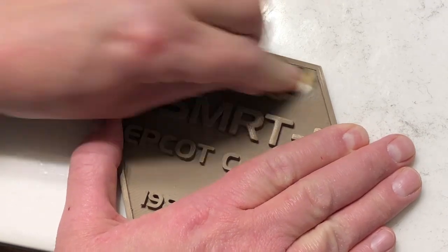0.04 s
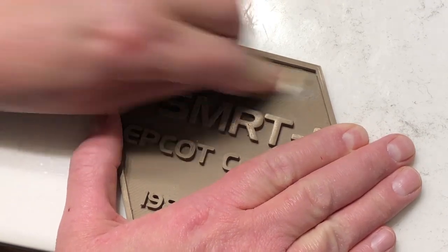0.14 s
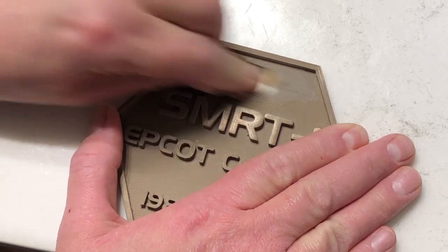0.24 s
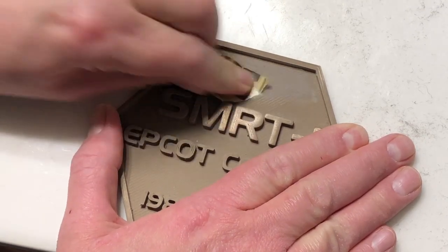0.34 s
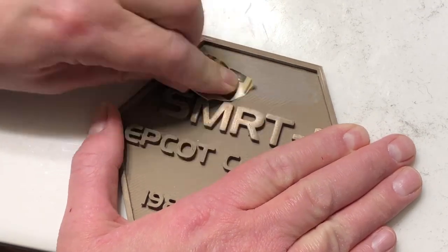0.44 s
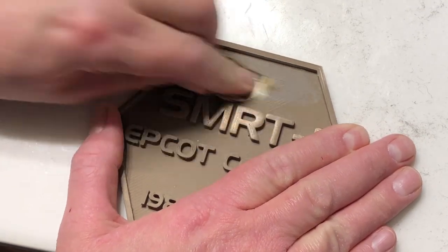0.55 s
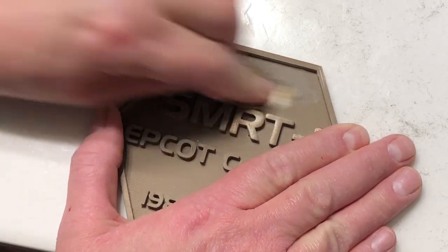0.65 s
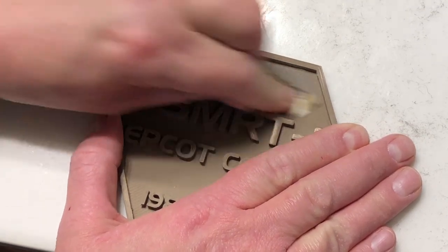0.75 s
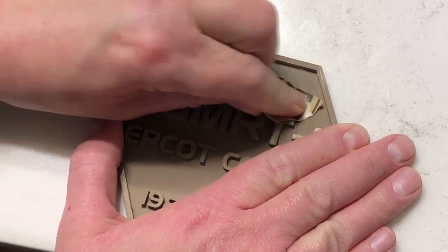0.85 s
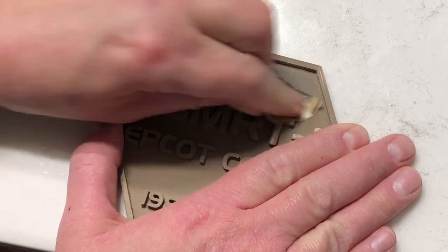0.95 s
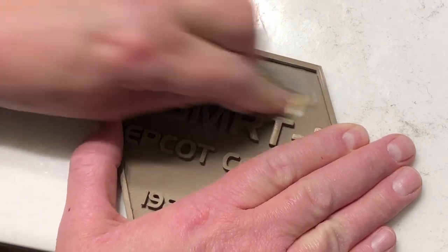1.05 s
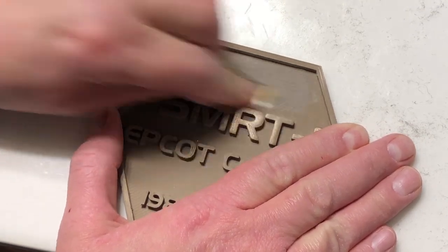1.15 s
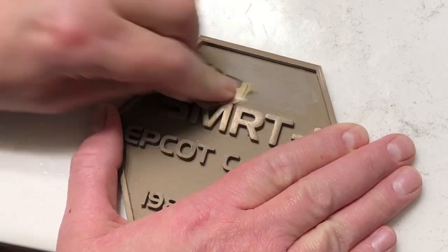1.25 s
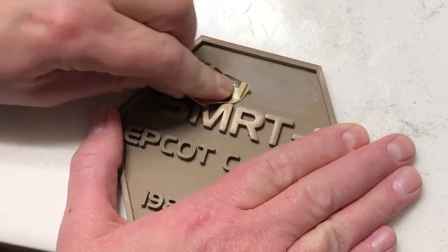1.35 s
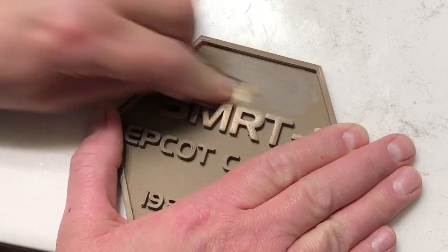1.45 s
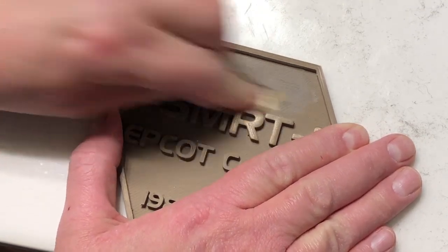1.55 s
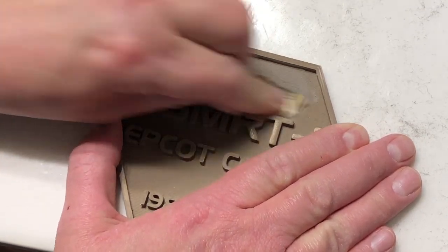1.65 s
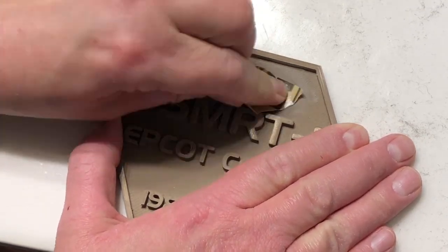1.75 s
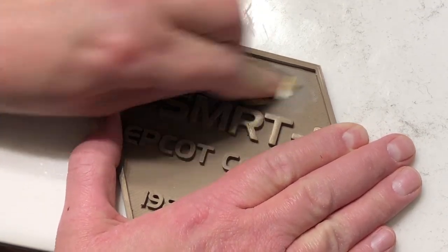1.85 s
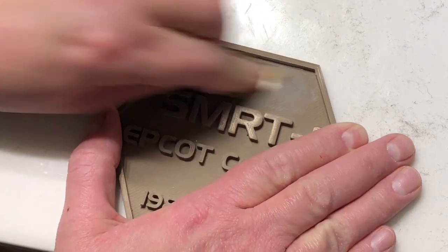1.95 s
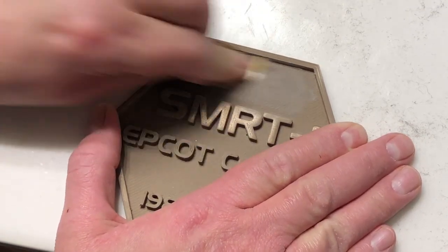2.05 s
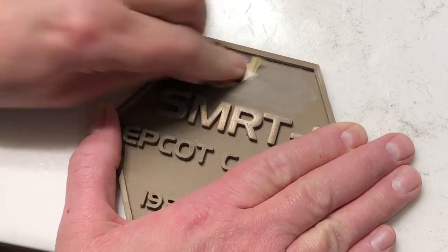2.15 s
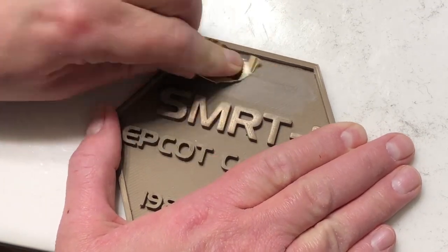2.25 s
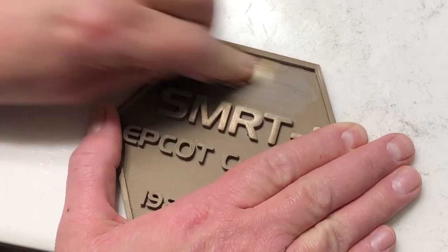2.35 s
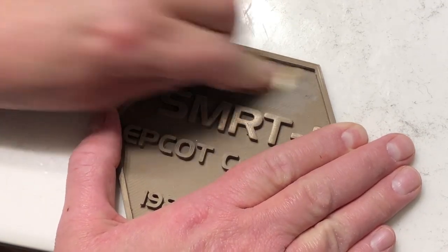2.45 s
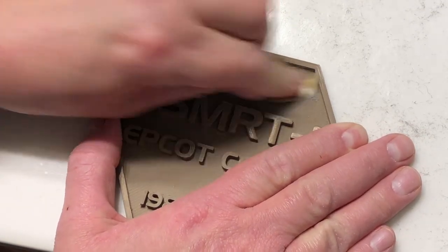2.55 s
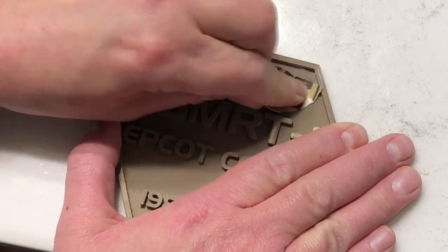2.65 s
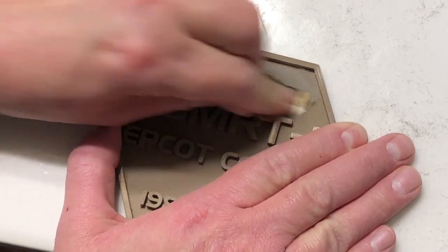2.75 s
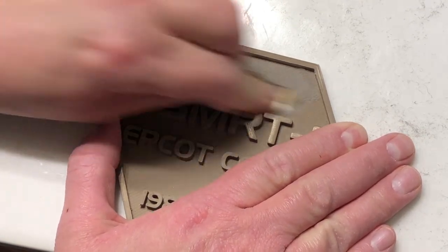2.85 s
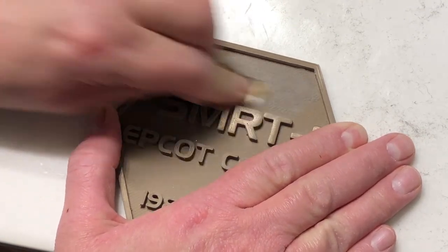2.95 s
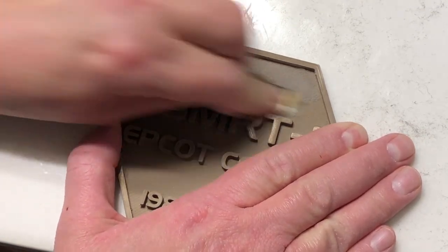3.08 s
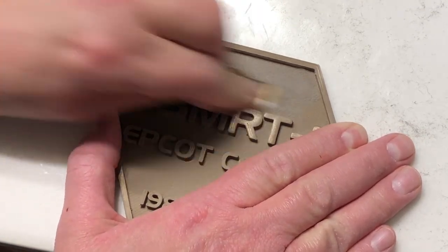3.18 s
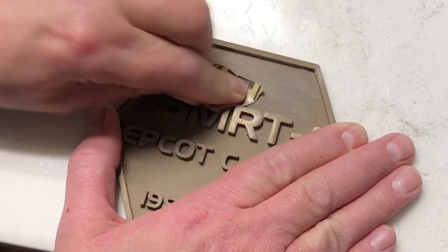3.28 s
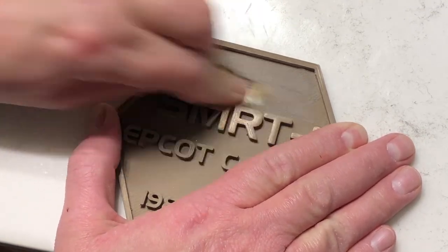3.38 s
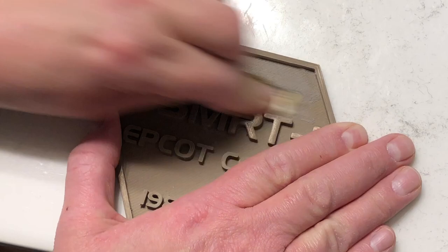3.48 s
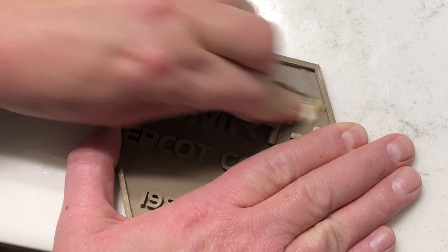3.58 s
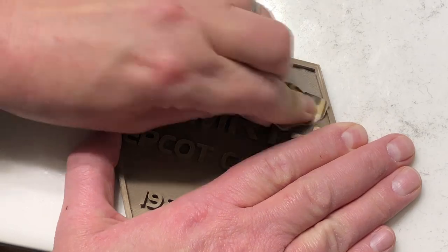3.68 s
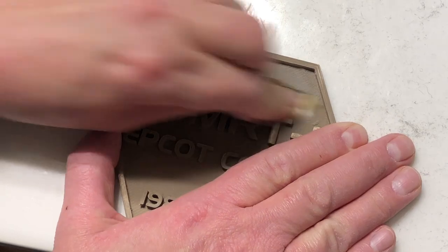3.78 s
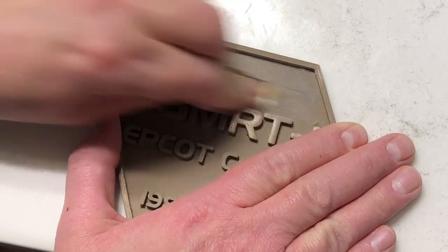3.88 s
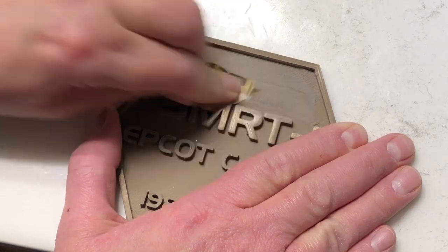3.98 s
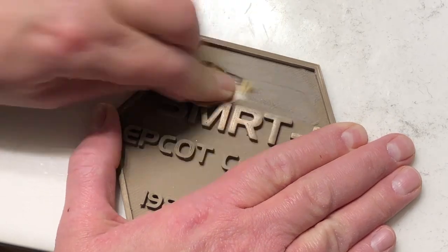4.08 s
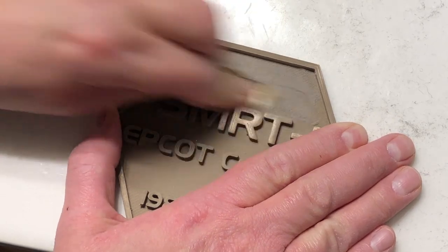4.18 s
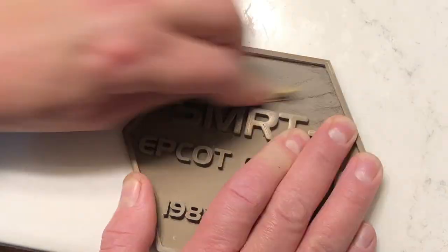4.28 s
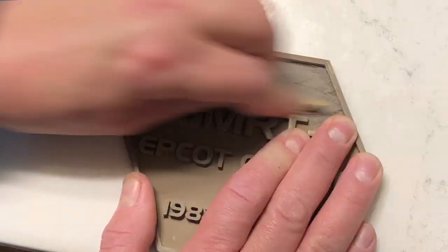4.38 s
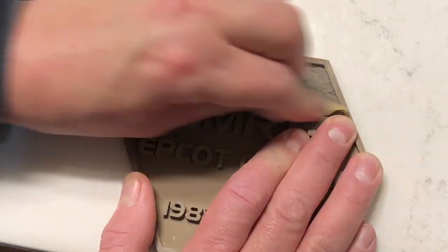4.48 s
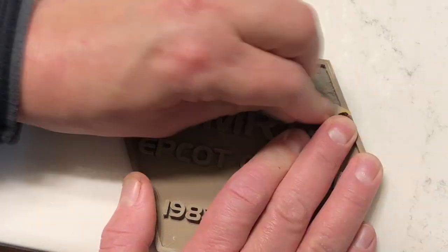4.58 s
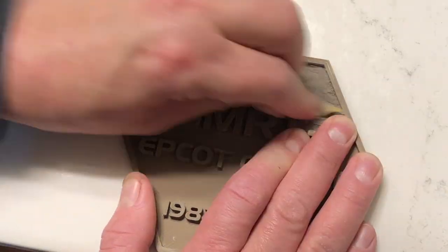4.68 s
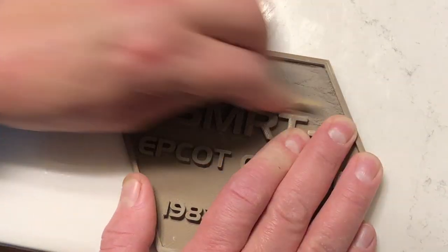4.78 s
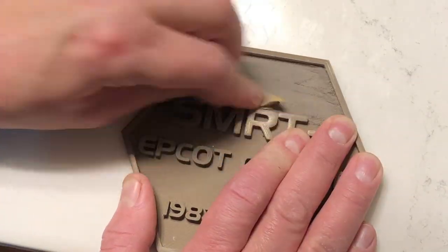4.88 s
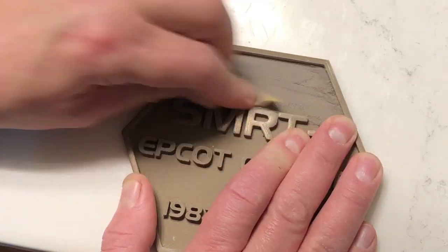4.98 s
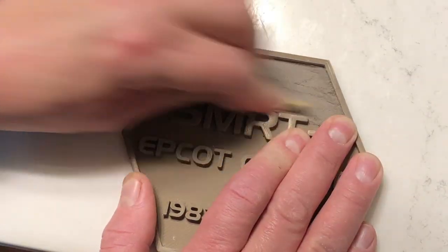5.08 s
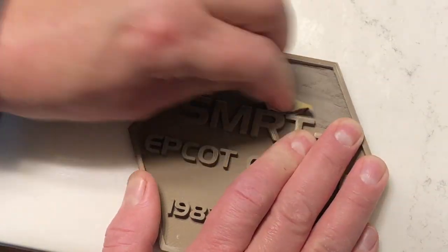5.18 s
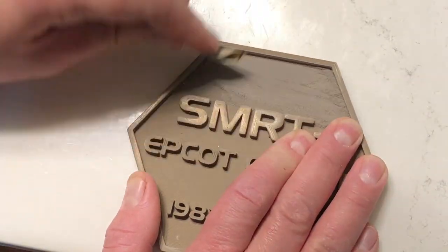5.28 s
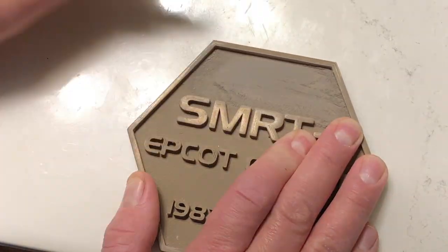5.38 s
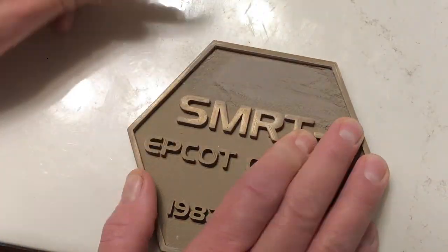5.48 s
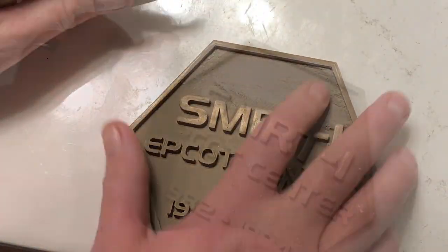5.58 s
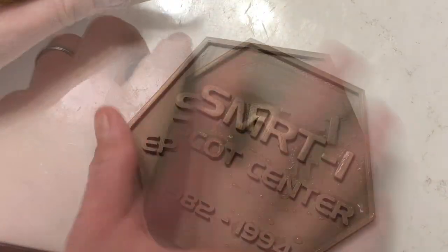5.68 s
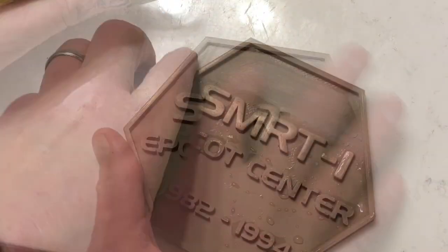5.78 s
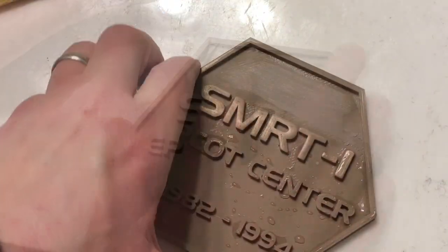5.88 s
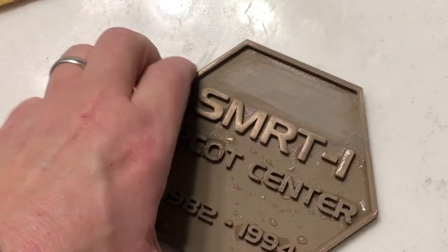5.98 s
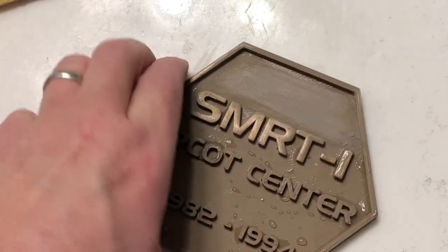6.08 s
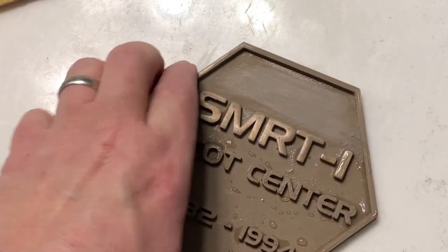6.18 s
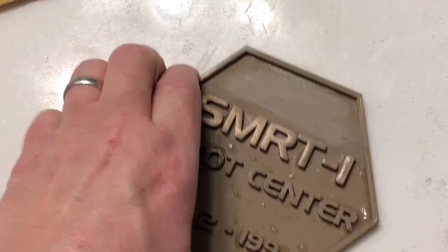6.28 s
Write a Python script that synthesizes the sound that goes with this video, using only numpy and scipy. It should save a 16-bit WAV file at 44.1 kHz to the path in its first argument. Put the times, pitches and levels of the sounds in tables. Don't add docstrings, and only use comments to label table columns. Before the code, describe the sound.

Folded sandpaper rasps rapidly to and fro on a small resin plaque, ringing brightly, with light knocks, then stops for faint brushing and tiny ticks.

```python
import sys
import numpy as np
from scipy import signal
from scipy.fft import rfft, irfft, next_fast_len
from scipy.io import wavfile
from scipy.ndimage import uniform_filter1d

SR = 44100
rng = np.random.default_rng(int(sys.argv[2]) if len(sys.argv) > 2 else 0)


def volts_from_decibels(level):
    exponent = np.asarray(level, float) / 20
    return 10 ** exponent


def generate_wav(sig):
    pcm = np.round(np.clip(np.atleast_2d(sig).T, -1, 1) * 32767).astype(np.int16)
    wavfile.write(sys.argv[1], SR, pcm)


N = 279153
T = np.arange(N) / SR
F = np.fft.rfftfreq(N, 1 / SR) + 1e-3
RIM_S = 4.366


def unit(x):
    return x / np.sqrt(np.mean(x ** 2))


def slope(points):
    hz, db = np.transpose(points)
    return volts_from_decibels(np.interp(np.log(F), np.log(hz), db))


def modes(rows):
    response = 0
    for k, (hz, width, db) in enumerate(rows):
        peak = 1j * F * width / (hz ** 2 - F ** 2 + 1j * F * width)
        response = response + (-1) ** k * volts_from_decibels(db) * peak
    return response


def colour(x, response):
    return irfft(rfft(x) * response / np.sqrt(np.mean(np.abs(response) ** 2)), N)


def walk(rate):
    k = int(SR / rate)
    steps = np.repeat(rng.standard_normal(N // k + 1), k)
    return 0.89 * uniform_filter1d(uniform_filter1d(steps, k), k)[:N]


def grit(spread_db, patchy_db, rate):
    size = volts_from_decibels(spread_db * rng.exponential(size=N) + patchy_db * walk(rate))
    return unit(size * rng.standard_normal(N))


def sustained(rows, steady):
    x = colour(rng.standard_normal(N), modes(rows) ** 2)
    swell = np.abs(signal.hilbert(x, next_fast_len(N))[:N])
    return unit(x / (swell + .2) ** steady)


def bursts(rows, rise_db_s, fall_db_s, rest_db):
    db = []
    for s, top_db, hold, *_ in rows:
        rise = rise_db_s * np.maximum(s - T, 0)
        fall = fall_db_s * np.maximum(T - s - hold, 0)
        db.append(top_db - rise - fall)
    return volts_from_decibels(np.maximum(np.max(db, axis=0), rest_db))


# (time [s], level [dB], hold [s])
THROBS = [(0, -56, 0.051), (.65, -54.5, .1), (1.2, -67, .2), (1.53, -54, 0.18), (2.05, -54.5, .05),
          (2.31, -49.5, 0.15), (2.5, -56, 0.067), (3.15, -58, 0.18), (3.82, -53, 0.18), (4.55, -50.5, 0.2),
          (4.97, -55, .02), (5.04, -54, 0.097), (5.37, -48, 0.22), (5.8, -62.5, 0.25), (6.21, -65.5, .04),
          (6.31, -58, .05)]
# (frequency [Hz], width [Hz], level [dB])
APPLIANCE_MODES = [(373.9, 41, 0.5), (306.5, 13, -5.5), (440, 70, -17.5), (676, 370, -17), (263, 26, -10)]


def appliance():
    pulse_hz, pulse_db = 20.7, 4
    peak_s = np.where(T < 5.69, 5.431, 5.895)
    pulse = pulse_db * np.cos(2 * np.pi * pulse_hz * (T - peak_s))
    throb = bursts(THROBS, rise_db_s=450, fall_db_s=131, rest_db=-68)
    return sustained(APPLIANCE_MODES, steady=0.85) * throb * volts_from_decibels(-0.44 + 1.2 * walk(45) + pulse)


# (frequency [Hz], level [dB per Hz])
ROOM_COLOUR = [(18, -43), (30, -18), (80, -11), (270, -5.5), (450, -12.5), (640, -9.5), (860, -13),
               (1600, -19.5), (2100, -17), (2800, -22), (4300, -19.5), (6500, -25), (9000, -29),
               (16000, -33)]
# (time [s], level [dB])
ROOM_LEVEL = [
    (0, -53.5),
    (5.3, -63.5),
    (5.45, -52),
    (5.58, -61),
    (5.76, -63.5),
    (5.95, -59),
    (6.15, -65),
    (6.33, -67),
]


def room_tone():
    s, db = np.transpose(ROOM_LEVEL)
    tone = colour(rng.standard_normal(N) * volts_from_decibels(0.97 * walk(6.0)), slope(ROOM_COLOUR))
    return tone * volts_from_decibels(np.interp(T, s, db))


# (time of full speed [s], push rasp [dB], pull rasp [dB], brightness [dB], finger place [-1 far .. 1 near])
FIELD_HAND = [(.047, -21.5, -26, 15, 0.95), (.388, -24.5, -22, -1, 0.5), (.719, -24, -23.5, -1.5, 0.42),
              (1.054, -24.5, -23.5, 0.5, 0.0018), (1.397, -24, -22, 2.5, -0.13),
              (1.736, -25, -22.5, 10.5, 0.066), (2.074, -24.5, -25, -4, 0.31),
              (2.411, -20.5, -27, 13.5, 0.77), (2.746, -25.5, -23.5, -3.5, 0.35),
              (3.081, -25.5, -24, 0.5, -0.61), (3.433, -26, -24, -9, -0.84),
              (3.783, -25.5, -23.5, -5, -0.42), (4.126, -25.5, -25, -1.5, -.6),
              (4.476, -25, -25.5, 2, -0.93)]
RIM_HAND = [
    (4.341, -25, -25, 19, 0.017),
    (4.673, -26.5, -25.5, 2, 0.023),
    (5.021, -25.5, -23.5, 3, -0.15),
    (5.384, -25.5, -27.5, -6, -0.11),
]
# (push level [dB], pull level [dB])
DRUM_DB = [(-51, -62.5), (-53, -62)]
# (push level [dB], pull level [dB])
COUNTER_DB = [(-49.5, -62), (-51.5, -63)]
# (time [s], rasp change [dB], counter change [dB])
UNEVEN = [(.047, .1, -13), (.104, 0.9, -3), (.215, -1.5, 9), (.275, -0.6, 3), (.555, -0.5, 4),
          (.665, -2.5, 8), (.719, -0.9, -9), (.771, -0.6, -6), (.89, .1, -9), (1.165, -0.4, -6),
          (1.228, 0.7, 8), (1.454, -1.1, 7), (1.506, -1.3, -2), (1.846, -1.4, -6), (1.91, -4, 6),
          (2.074, -0.8, -4), (2.24, 0, -7), (2.411, -1.1, -9), (2.522, -0.7, -2), (2.58, -0.3, 1),
          (2.694, 0.7, -9), (2.746, -1.1, -5), (3.144, 0.5, -7), (3.374, -0.5, 9), (3.494, 0.5, -10.5),
          (3.725, -0.3, -4), (4.62, -1, -8), (4.84, -1, 4), (5.265, -3, 1), (5.328, 0, 12)]
PULL_AT = 0.51
DRUM_SCATTER_DB, COUNTER_SCATTER_DB = (0.64, 1.2), (1.1, 1.5)
RASP_SCATTER_DB, TURN_DB, TURN_SCATTER_DB = .4, -8, 1.6


def hand():
    rows, every = [], 3
    for rim, table in enumerate((FIELD_HAND, RIM_HAND)):
        cycle = np.arange(-1, every * (len(table) - 1) + 1) / every
        columns = [np.interp(cycle, np.arange(len(table)), c) for c in np.transpose(table)]
        s, push_db, pull_db, bright_db, place = columns
        s[0] = 2 * s[1] - s[2]
        for pull, db in enumerate((push_db, pull_db)):
            at = s[:-1] + pull * PULL_AT * np.diff(s)
            luck = rng.standard_normal((len(at), 4)).T
            heavy_db = 0
            for knock_s, _, _, extra_db in KNOCKS:
                heavy_db = heavy_db + extra_db * (np.abs(at - knock_s) < .04) * (1 - pull)
            direction = at * 0 + 2 * pull - 1
            rasp_db = db[:-1] + RASP_SCATTER_DB * luck[0]
            dip_db = TURN_DB + TURN_SCATTER_DB * luck[1]
            drum_db = DRUM_DB[rim][pull] + DRUM_SCATTER_DB[pull] * luck[2] + heavy_db
            counter_db = COUNTER_DB[rim][pull] + COUNTER_SCATTER_DB[pull] * luck[3] + .5 * heavy_db
            row = np.array([at, direction, rasp_db, dip_db, bright_db[:-1], place[:-1], drum_db, counter_db]).T
            rows.append(row[(at >= RIM_S) == rim])
    rows = np.concatenate(rows)
    for s, rasp_db, counter_db in UNEVEN:
        rows[np.argmin(np.abs(rows[:, 0] - s)), [2, 7]] += rasp_db, counter_db
    return rows[np.argsort(rows[:, 0])]


def strokes(rows, late):
    s, *columns = np.transpose(rows)
    phase = np.interp(T, s + late, np.arange(len(s)))
    glide = phase - np.sin(2 * np.pi * phase) / (2 * np.pi)
    return np.sin(np.pi * phase) ** 2, [np.interp(glide, np.arange(len(s)), c) for c in columns]


# (frequency [Hz], level [dB per Hz])
FLAT_RASP = [(1000, -65), (1220, -31), (1300, -24), (2100, -18.5), (2500, -19.5), (3400, -12.5),
             (3900, -11), (6300, -8.5), (7100, -6.5), (10400, -7.5), (14700, -3.5), (16000, -10)]
RIM_RASP = [(1000, -21.5), (1300, -13), (2000, -13.5), (2500, -13), (3050, -5), (4960, -6.5), (5900, 1.5),
            (8260, -3.5), (15200, -2.5), (16000, -4.5)]
# (frequency [Hz], width [Hz], level over the rasp [dB])
FLAT_MODES = [(1820, 140, 3.5), (2080, 110, 4.5), (2670, 14, 9), (3363, 17, 3), (3870, 127, 13),
              (4280, 70, 6.5), (4754, 230, 9.5), (5240, 160, 8.5), (5756, 91, 11), (6194, 147, 10),
              (6780, 54, 4.5), (8250, 49, -6.5), (9010, 740, 1), (11100, 310, 1)]
RIM_MODES = [(1990, 230, 7), (3060, 415, -0.5), (4230, 290, 4), (5760, 2100, 1.5), (7760, 160, -9),
             (11300, 360, 1)]
EDGES_HZ = [1700, 2400, 4400, 5500, 6700, 10500]
# (on the field [dB], at the rim [dB], per unit of finger place [dB])
LOW_ON_PULL, MIDDLE_ON_PUSH = (3.2, -0.28, 3.5), (2.23, .6, .1)
UPPER_RING, LOW_TREBLE = (-1.2, -3, 3.8), (.1, .1, -5)


def rasp(rows):
    turn, (pull, db, dip_db, treble_db, finger, _, _) = strokes(rows, 0)

    def shift(field_db, rim_db, per_place_db):
        return np.where(T < RIM_S, field_db, rim_db) + per_place_db * finger

    low_db = shift(*LOW_ON_PULL) * pull
    middle_db = shift(*MIDDLE_ON_PUSH) * pull
    dip_db = dip_db * turn ** 1.15
    ring_db = 0.7 * dip_db - 0.1 * treble_db
    hiss_db = 1.18 * dip_db + 0.12 * treble_db - .2
    part_db = [0.16 * dip_db, low_db + 0.44 * dip_db, ring_db, ring_db - middle_db,
               ring_db + shift(*UPPER_RING) + middle_db, hiss_db + shift(*LOW_TREBLE), hiss_db]
    grains = grit(1.5, 0.94, 180) * volts_from_decibels(db + 0.19)
    spectrum = 0
    for place, shape, peaks in ((T < RIM_S, FLAT_RASP, FLAT_MODES), (T >= RIM_S, RIM_RASP, RIM_MODES)):
        ringing = sum(np.abs(modes([peak])) ** 2 for peak in peaks)
        spectrum = spectrum + rfft(colour(grains * place, slope(shape) * np.sqrt(1 + ringing)))
    above = [1] + [1 / (1 + (hz / F) ** 24) for hz in EDGES_HZ] + [0]
    out = 0
    for k, gain_db in enumerate(part_db):
        part = irfft(spectrum * (above[k] - above[k + 1]), N)
        out = out + part * volts_from_decibels(gain_db + 1.09 * walk(25.16))
    return out


def walls(paper):
    t = np.arange(SR // 4) / SR
    tail = rng.standard_normal(len(t)) * np.exp(-np.log(1000) * t / 0.19) * (t > .003)
    wet = signal.fftconvolve(paper, tail / np.sqrt(np.sum(tail ** 2)))[:N]
    return volts_from_decibels(-14.0) * colour(wet, 1 / (1 + 1j * F / 8700))


HAND_LATE_S = .007
# (frequency [Hz], width [Hz], level [dB])
DRUM_MODES = [(216, 31, -2.5), (328, 93, -2), (503, 31, -1.5), (567, 43, 1), (706, 31, -1.5),
              (784, 34, 0.5), (1073, 70, 0), (1124, 65, -1), (1294, 63, 3.5)]


def drumming(rows):
    turn, (*_, drum_db, _) = strokes(rows, HAND_LATE_S)
    pressure = grit(1.4, 1.6, 60) * volts_from_decibels(drum_db + 1.5 - 0.35 * turn)
    return colour(pressure, modes(DRUM_MODES) / (1 + (F / 1400) ** 8))


def counter_shake(rows):
    _, (*_, counter_db) = strokes(rows, HAND_LATE_S)
    hz = 76.7 * (1 + 0.095 * walk(30))
    hum = np.sin(2 * np.pi * np.cumsum(hz) / SR) * volts_from_decibels(counter_db + 2.5 + 1.9 * walk(60))
    rumble = colour(rng.standard_normal(N) * volts_from_decibels(counter_db - 19), 1 / (1 + (F / 90) ** 4))
    return hum + rumble


# (time [s], level [dB], hold [s], extra drumming [dB])
KNOCKS = [(0.034, -52, 0.038, 2.1), (0.607, -44, .005, 5.5), (0.943, -46.5, .04, 2.5),
          (1.063, -43, .005, 4), (1.19, -50, .005, 5.5), (1.29, -48.5, .005, -2), (1.414, -45, .01, 7.5),
          (1.844, -45, .005, -1.5), (2.66, -51.5, 0.018, 1.2), (2.892, -48, .005, -0.5),
          (3.202, -51, .02, 2.5), (3.44, -52, 0.038, 1), (3.547, -51, .01, 4), (3.928, -52.5, 0.025, 2),
          (4.945, -48, .005, .1), (5.15, -63, .01, 1), (5.278, -47, .04, 6.5)]
# (frequency [Hz], width [Hz], level [dB])
KNOCK_MODES = [(140.6, 24, 0.014), (183.7, 26, 0.0038)]


def knocking():
    gain = bursts(KNOCKS, rise_db_s=451, fall_db_s=298.5, rest_db=-59.5)
    return sustained(KNOCK_MODES, steady=1.0) * gain * (T < 5.45)


# (time [s], half width [s], hiss [dB], dull scuff [dB])
BRUSH = [
    (5.458, 0.013, -54, -49.5),
    (5.514, 0.022, -53, -54),
    (5.555, 0.021, -53.5, -67),
    (5.753, 0.029, -52.5, -63),
    (5.885, 0.013, -58, -72),
    (5.975, .015, -69, -71),
    (6.13, .15, -73, -84),
    (6.205, .006, -65, -81),
]


def brushing():
    hiss_gain, dull_gain = 0, 0
    for s, half, hiss_db, dull_db in BRUSH:
        swell = np.exp(-((T - s) / half) ** 2)
        hiss_gain = hiss_gain + swell * volts_from_decibels(hiss_db)
        dull_gain = dull_gain + swell * volts_from_decibels(dull_db)
    hiss = grit(1.7, 1.5, 120) * hiss_gain
    dull = grit(1.7, 1.4, 95) * dull_gain
    hiss_colour = (1 + modes([(6500, 1800, 5.2)])) / (1 + (5000 / F) ** 4)
    return colour(hiss, hiss_colour) + colour(dull, modes([(3150, 2000, 0)]) ** 2)


# (time [s], peak level [dB], ring frequency [Hz])
TICKS = [
    (6.056, -55, 12500),
    (6.087, -60, 12500),
    (6.1377, -43, 12500),
    (6.151, -52, 12600),
    (6.195, -58, 14600),
    (6.204, -57, 15000),
]


def paper_ticks():
    out = np.zeros(N)
    t = np.arange(600) / SR
    for s, db, hz in TICKS:
        ring = np.sin(2 * np.pi * hz * t) * np.exp(-t / 0.0019)
        click = .5 * np.diff(rng.standard_normal(len(t) + 1)) * np.exp(-t / .0006)
        start = int(s * SR)
        out[start:start + len(t)] += volts_from_decibels(db) * (ring + click)
    return out


def scene():
    last_s, lift_s = 5.33, .068
    lift = volts_from_decibels(-30 * np.clip((T - last_s) / lift_s, 0, 2) ** 1.8)
    background = appliance() + room_tone()
    rows = hand()
    paper = rasp(rows) * lift
    pressed = (drumming(rows) + counter_shake(rows)) * lift
    touches = brushing() + paper_ticks()
    return (background + paper + walls(paper) + pressed + knocking() + touches)[None]


# (time [s], half width [s], share of partials kept [0-1], level of the rest [dB])
THIN_MOMENTS = [(.511, 0.014, 0.08, -10), (.789, .011, 0.18, -14), (.873, 0.008, .08, -15),
                (1.034, 0.016, .09, -27), (1.854, 0.008, 0.05, -19), (1.894, 0.011, .08, -14),
                (3.133, 0.011, 0.01, -15), (4.033, 0.011, .07, -14), (4.712, 0.0081, .1, -23),
                (5.011, 0.01, 0.03, -17), (5.547, 0.0065, .04, -24), (5.693, 0.0042, 0.08, -23),
                (6.311, .007, 0.09, -23)]


def thin_out(x):
    out, size = x.copy(), 1024
    window = np.hanning(size)
    for s, half, share, rest_db in THIN_MOMENTS:
        at = slice(int(s * SR) - size // 2, int(s * SR) + size // 2)
        spectrum = rfft(x[at] * np.sqrt(window))
        size_hz = np.abs(spectrum)
        rank = size_hz / uniform_filter1d(size_hz, size=61) ** .5
        kept = rank >= np.quantile(rank, np.clip(1 - share, 0, 1))
        partials = irfft(spectrum * np.where(kept, 1, volts_from_decibels(rest_db - 5)), size)
        partials *= 1.13 * np.std(irfft(spectrum, size)) / np.std(partials)
        fade = np.clip(1.5 - np.abs(T[at] - s) / half, 0, 1) * (window > 0)
        out[at] = x[at] * np.cos(np.pi / 2 * fade) + partials * np.sin(np.pi / 2 * fade)
    return out


def band_limit(x):
    return signal.sosfilt(signal.butter(12, 17060, fs=SR, output="sos"), x)


# (time [s], half width [s], level [dB])
DIPS = [
    (4.366, 0.014, -25.5),
    (5.295, .012, -5),
    (5.69, 0.043, -11.5),
]


def record(dry):
    dip_db = sum(db * np.exp(-((T - s) / half) ** 2) for s, half, db in DIPS)
    thinned = thin_out(dry[0] * volts_from_decibels(dip_db))
    top_cut = signal.ellip(12, .3, 80, 15740, fs=SR, output="sos")
    return band_limit(signal.sosfilt(top_cut, thinned)[None])


dry = scene()
out = record(dry)
generate_wav(out)
```